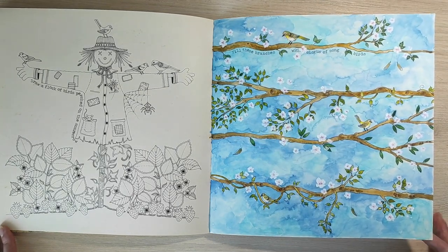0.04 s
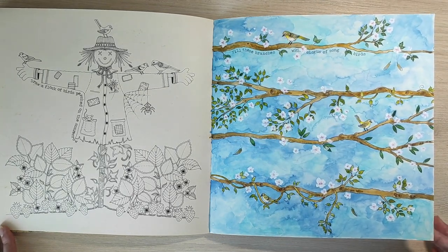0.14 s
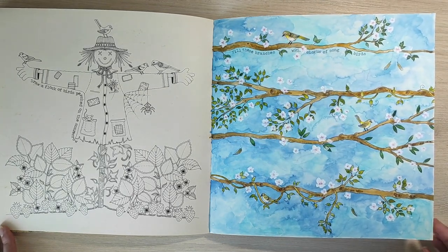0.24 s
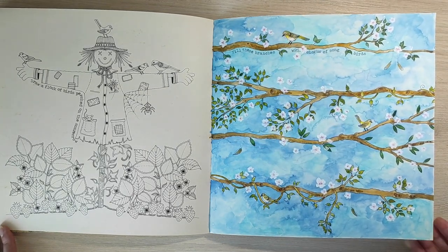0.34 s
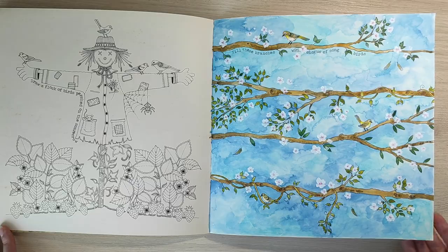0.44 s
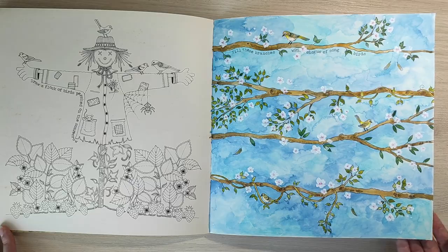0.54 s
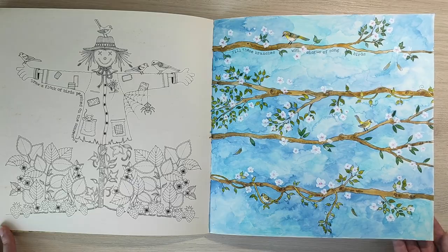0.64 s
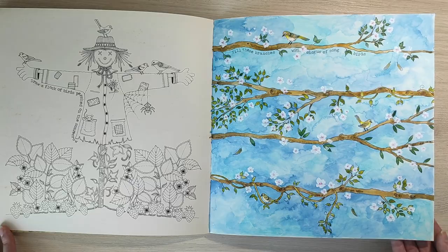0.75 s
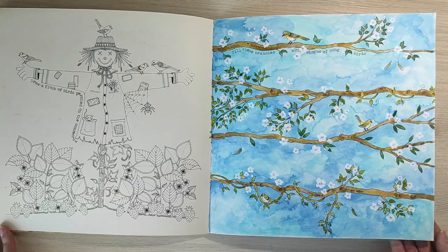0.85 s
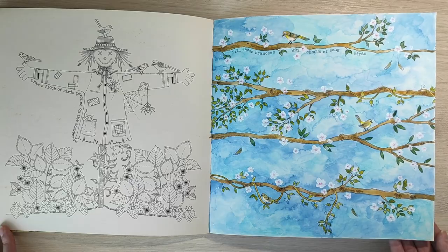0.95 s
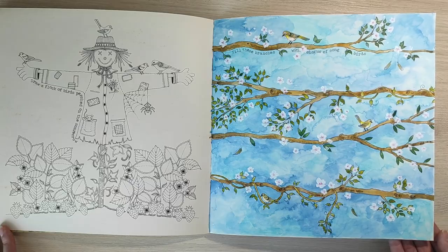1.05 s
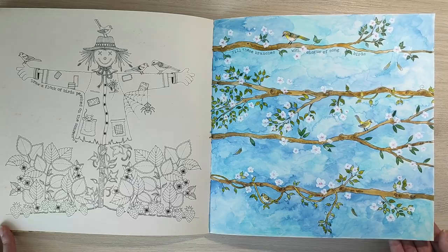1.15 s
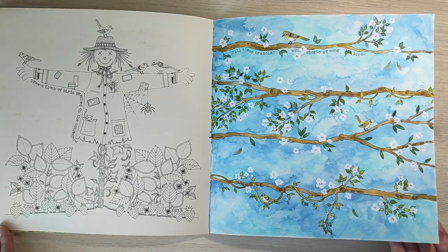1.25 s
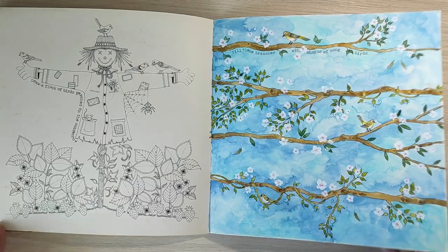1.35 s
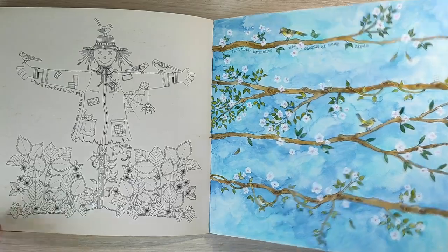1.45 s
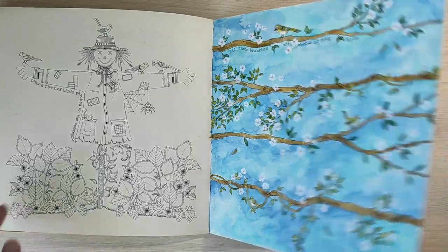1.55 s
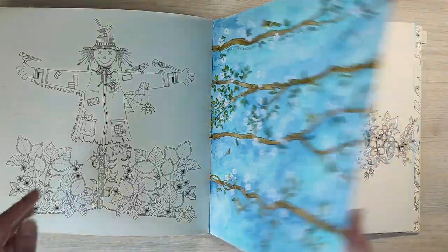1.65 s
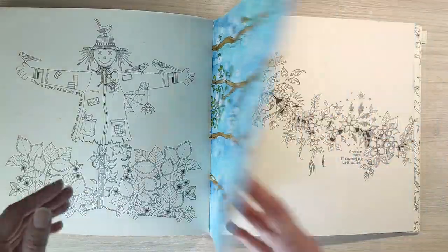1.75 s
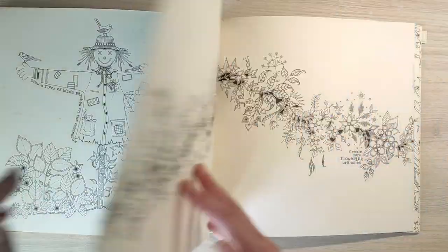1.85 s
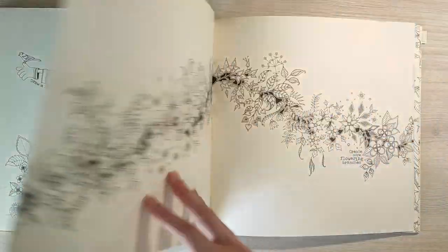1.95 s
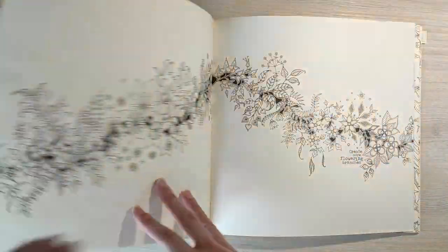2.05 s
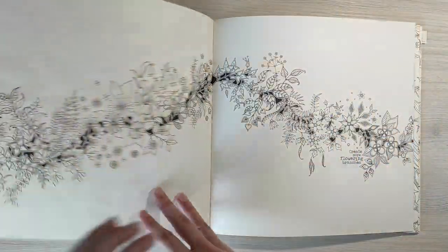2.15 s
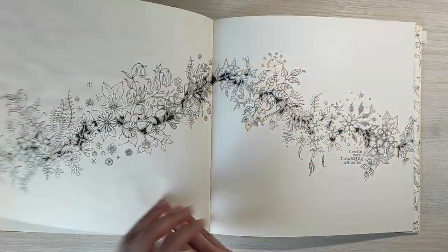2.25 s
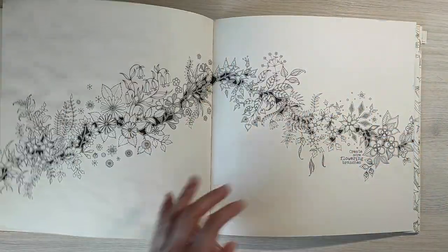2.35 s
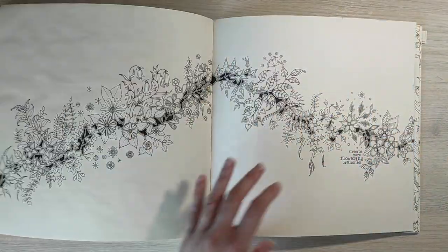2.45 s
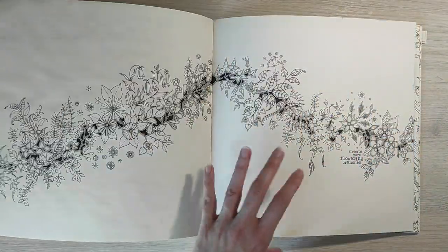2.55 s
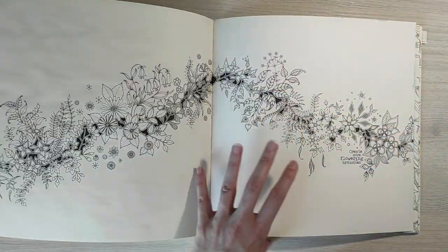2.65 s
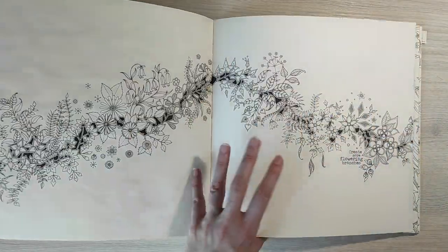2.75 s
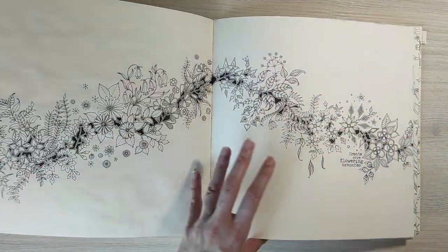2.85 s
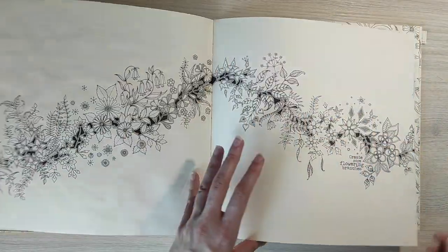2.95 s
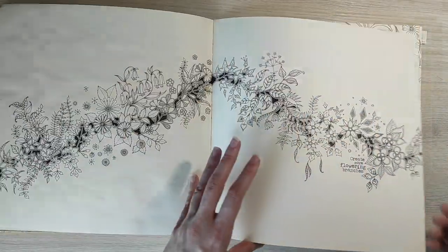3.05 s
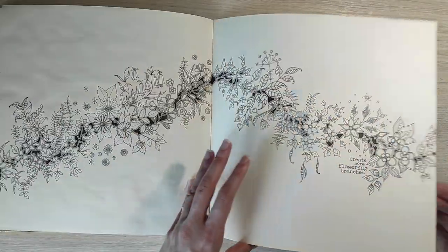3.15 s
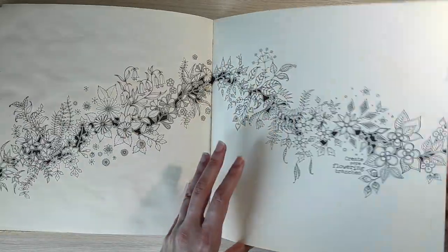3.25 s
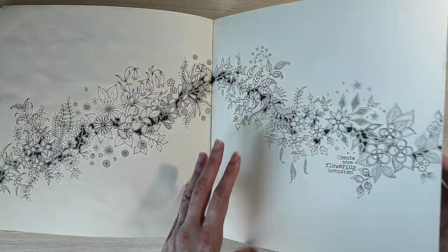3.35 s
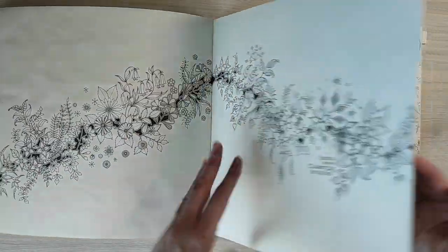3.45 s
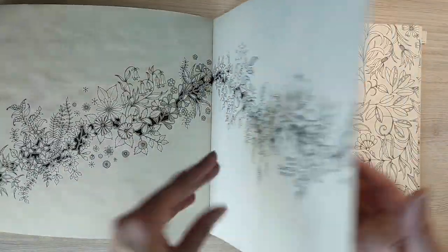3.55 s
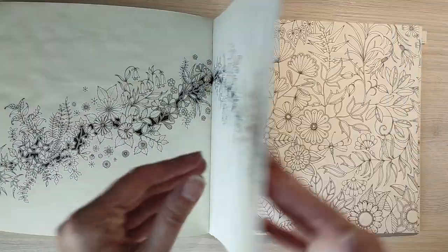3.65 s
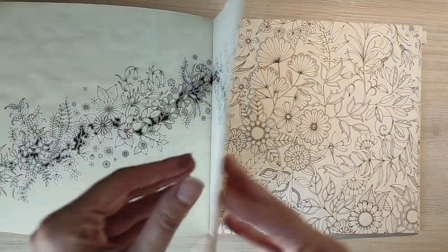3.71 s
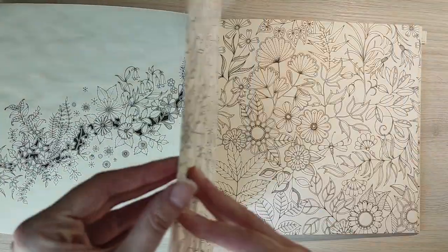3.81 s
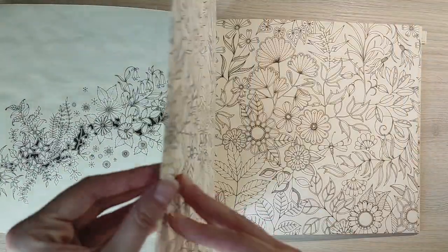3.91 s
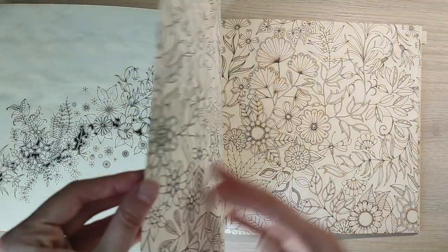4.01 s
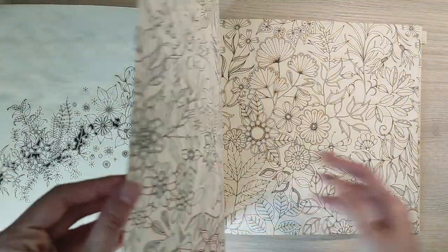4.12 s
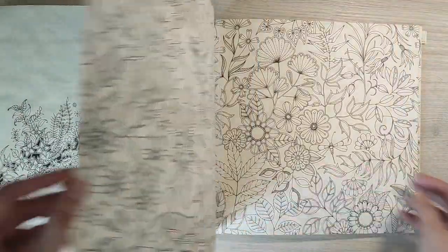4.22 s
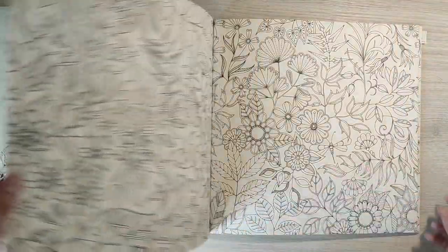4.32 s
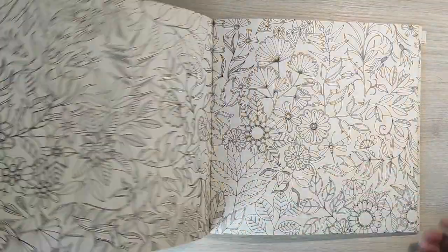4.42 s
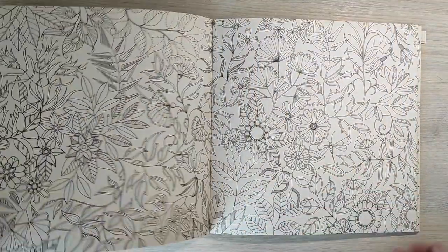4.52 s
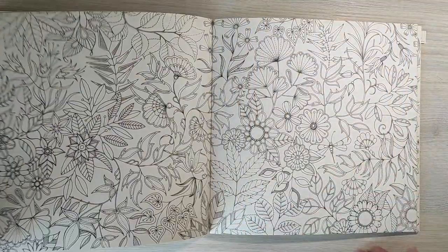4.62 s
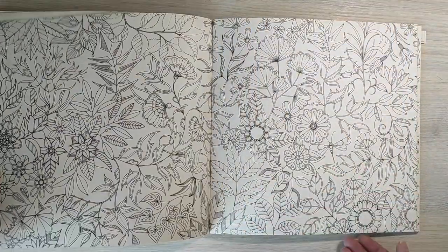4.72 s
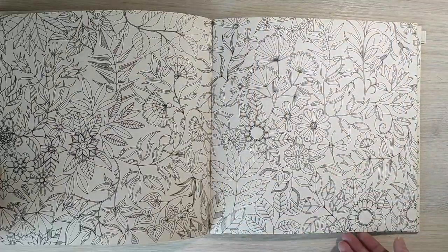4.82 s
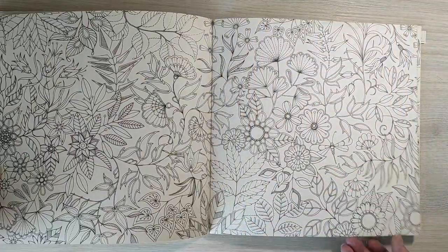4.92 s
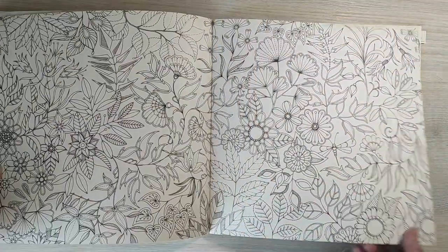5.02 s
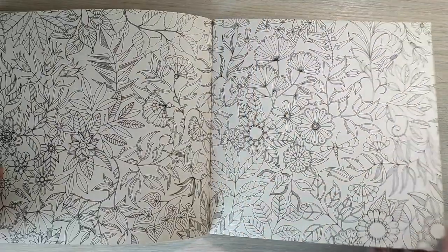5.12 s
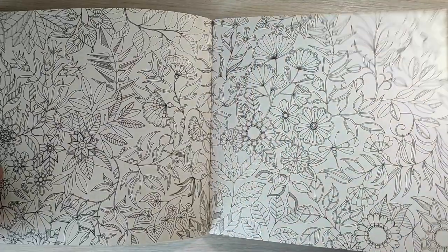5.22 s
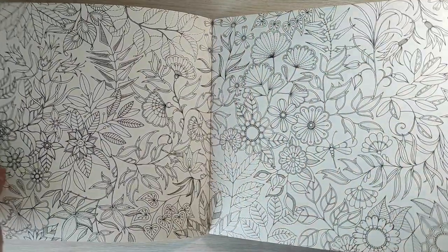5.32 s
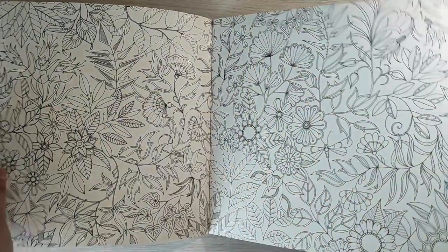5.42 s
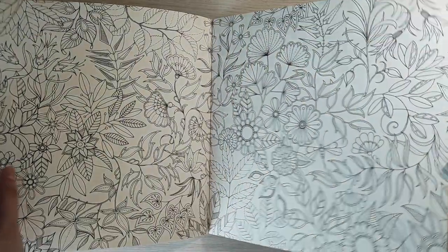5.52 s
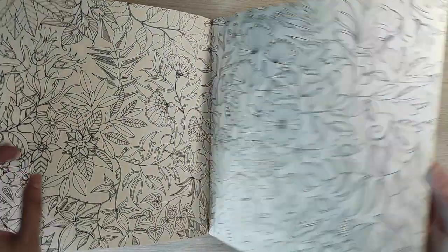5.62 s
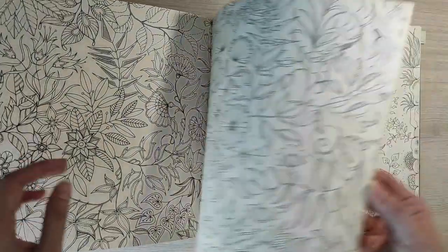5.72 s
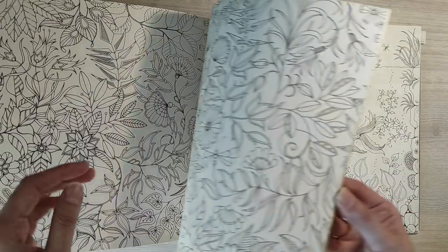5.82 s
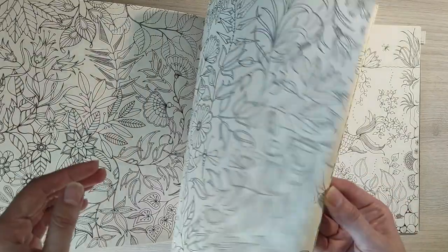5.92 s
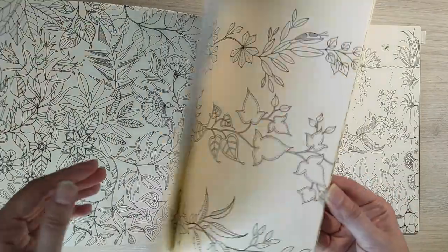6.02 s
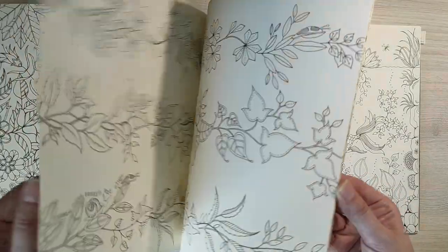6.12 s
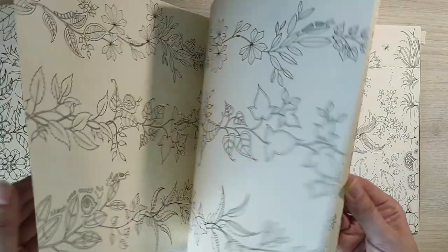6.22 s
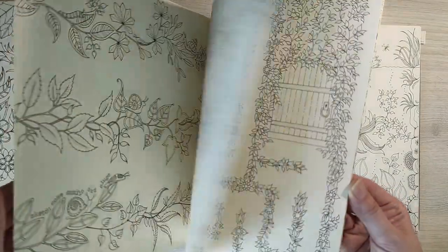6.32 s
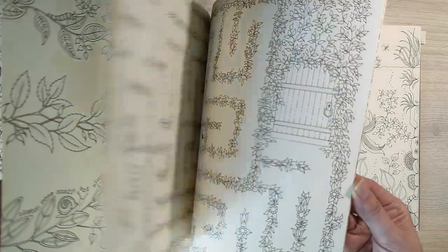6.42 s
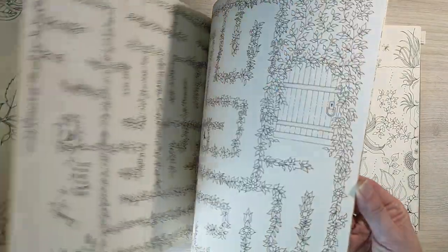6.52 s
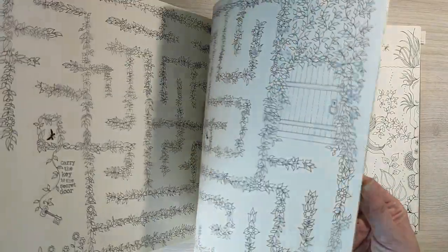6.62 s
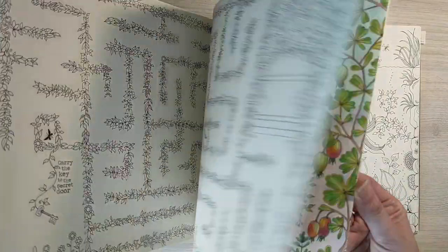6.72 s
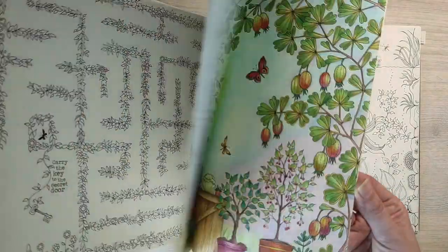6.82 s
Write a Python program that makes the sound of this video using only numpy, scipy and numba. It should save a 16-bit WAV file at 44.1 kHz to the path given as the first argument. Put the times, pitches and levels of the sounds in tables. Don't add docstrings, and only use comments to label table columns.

```python
import sys
import numpy as np
from scipy import signal
from scipy.fft import rfft, irfft, next_fast_len
from scipy.io import wavfile
from scipy.ndimage import uniform_filter1d
from numba import njit

SR = 44100
rng = np.random.default_rng(int(sys.argv[2]) if len(sys.argv) > 2 else 0)


def ratio(d):
    e = np.asarray(d, float) / 20
    return 10 ** e


def dump(signal):
    limited = np.clip(np.atleast_2d(signal).T, -1, 1)
    pcm = np.round(limited * 32767).astype(np.int16)
    wavfile.write(sys.argv[1], SR, pcm)


N = 302741
STEP = 8


def rms_one(x):
    return x / np.sqrt(np.mean(x ** 2) + 1e-20)


def in_time(table):
    s, *columns = np.transpose(table)
    return [np.interp(np.arange(0, N, STEP) / SR, s, c) for c in columns]


def at_rate(control):
    return np.interp(np.arange(N) / STEP, np.arange(len(control)), control)


def band(x, low_hz, high_hz, order=2):
    return signal.sosfilt(signal.butter(order, [low_hz, high_hz], "band", fs=SR, output="sos"), x)


def resonance(x, hz, width_hz):
    r = np.exp(-np.pi * width_hz / SR)
    poles = [1, -2 * r * np.cos(2 * np.pi * hz / SR), r * r]
    return signal.lfilter(np.array([1, 0, -1]) * (1 - r * r) / 2, poles, x)


@njit
def moving_resonance(x, hz, r, rate):
    first, out = np.zeros(len(x)), np.zeros(len(x))
    for i in range(2, len(x)):
        pull = 2 * r * np.cos(2 * np.pi * hz[i] / rate)
        first[i] = x[i] - x[i - 2] + pull * first[i - 1] - r * r * first[i - 2]
        out[i] = first[i] - first[i - 2] + pull * out[i - 1] - r * r * out[i - 2]
    return out


def drift(rate_hz):
    r = np.exp(-32 * np.pi * rate_hz / SR)
    noise = rng.standard_normal(N // 16 + 3002)
    slow = signal.lfilter([1], [1, -2 * r, r * r], noise)[3000:]
    return np.interp(np.arange(N) / 16, np.arange(len(slow)), rms_one(slow))


def sides(pan_db):
    return ratio(np.multiply.outer([.5, -.5], pan_db))


def pair(alike):
    mid, side = rng.standard_normal((2, N))
    return np.sqrt((1 + alike) / 2) * mid + np.sqrt((1 - alike) / 2) * side * [[1], [-1]]


def patchy(edges_hz, patch_db):
    noise = rng.standard_normal((2, 2, N))
    total = 0
    for k, (low_hz, high_hz) in enumerate(zip(edges_hz, edges_hz[1:])):
        total = total + band(noise[k % 2], low_hz, high_hz) * ratio(patch_db * drift(9.6))
    return rms_one(total)


def swell(peak_s, db, rise_s, fall_s):
    start, end = (peak_s - 5 * rise_s, db - 100), (peak_s + 5 * fall_s, db - 100)
    level_db, = in_time([start, (peak_s, db), end])
    return ratio(2 * level_db)


# pitch_hz, density_db (per Hz)
AIR_COLOUR = [(8, -58), (30, -65), (50, -65.5), (80, -74), (150, -81.5), (330, -80.5), (500, -87),
              (1100, -90), (2300, -97.5), (4000, -103), (7000, -108), (16000, -108)]
# pitch_hz, likeness (0-1), left_over_right_db
AIR_WIDTH = [(15, 0.83, -1), (40, 0.47, 5), (130, 0.2, 8), (300, 0.24, 7), (640, 0.1, 6), (1570, 0, -0.5),
             (9000, 0.13, 3.5)]


def room_air():
    size = next_fast_len(N, real=True)
    log_hz = np.log(np.maximum(np.arange(size // 2 + 1) * SR / size, 1))
    hz, db = np.transpose(AIR_COLOUR)
    level_db = np.interp(log_hz, np.log(hz), db)
    hz, alike, pan_db = np.transpose(AIR_WIDTH)
    alike = np.interp(log_hz, np.log(hz), alike)
    pan_db = np.interp(log_hz, np.log(hz), pan_db)
    mid, side = rfft(rng.standard_normal((2, size))) * ratio(level_db) * np.sqrt(SR / 4)
    both = np.sqrt(1 + alike) * mid + np.sqrt(1 - alike) * side * [[1], [-1]]
    return irfft(both * sides(pan_db), size)[:, :N] * ratio(1.0 * drift(2.2))


def whine():
    turns = np.cumsum(2552 + 3.44 * drift(5.3)) / SR
    tone = np.array([np.sin(2 * np.pi * turns), np.cos(2 * np.pi * turns)])
    return ratio(-65) * tone * ratio(2.4 * drift(0.62))


def hum():
    hz, width_hz = 147.1, 23
    ring = resonance(resonance(pair(0.6), hz, width_hz), hz, width_hz)
    return ratio(-60.5) * rms_one(ring) * sides(6.0)[:, None]


REST_HISS_DB, REST_BODY_DB = -77, -74
RASP_DB, RASP_FOLLOWS = -6, 0.5
BODY_LINGERS = 1.2
# peak_s, hiss_db, rise_s, fall_s, body_db (re
BRUSHES = [(.14, -63, .03, .08, -6), (.258, -57.5, 0.1, 0.095, 0), (2.768, -44, 0.0019, 0.079, -1.5),
           (2.874, -43.5, 0.031, 0.12, -3), (2.965, -43.5, 0.047, 0.084, -2), (3.01, -40, 0.038, 0.035, -6),
           (3.085, -58.5, .08, 0.075, 6), (3.276, -49.5, 0.31, 0.11, -7.5), (3.42, -44.5, 0.054, .09, -1),
           (3.462, -47.5, 0.066, .03, 6.5), (3.488, -41.5, .06, 0.041, -11),
           (3.678, -52.5, 0.049, 1, -13.5), (4.024, -47.5, 0.11, 0.029, -13),
           (4.082, -47, 0.036, 0.023, -15), (4.2, -56, 0.13, 0.14, -2), (4.435, -46.5, 0.052, 0.049, -6),
           (4.609, -47.5, 0.015, 0.13, -2.5), (4.68, -53.5, 0.16, 0.014, 3.5), (4.761, -48, .004, 0.1, 2.5),
           (4.848, -40, 0.012, 0.026, -6.5), (4.96, -45, 0.026, 0.076, -10), (4.925, -47, .06, 0.036, -3),
           (3.16, -50, 0.041, 0.037, 2.5),
           (5.746, -43.5, .012, 0.11, -8),
    (5.719, -47, 0.14, 0.055, -10),
    (5.838, -47, 0.04, 0.048, -8.5),
    (5.98, -42.5, 0.0065, 0.065, -2),
    (6.202, -39.5, 0.0022, 0.084, -6),
    (6.275, -45, 0.012, 0.041, -2),
    (6.407, -44, 0.025, 0.031, -8.5),
    (6.547, -57, 0.44, 0.1, -4.5),
    (6.656, -57, 0.012, 0.019, 4),
    (6.703, -44, 0.012, 0.008, -1.5),
]


def brush_power():
    hiss = ratio(2 * REST_HISS_DB)
    rasp = ratio(2 * (REST_HISS_DB + RASP_DB))
    body = ratio(2 * REST_BODY_DB)
    for peak_s, db, rise_s, fall_s, body_db in BRUSHES:
        power = swell(peak_s, db, rise_s, fall_s)
        hiss = hiss + power
        rasp = rasp + power * ratio(2 * (RASP_DB + RASP_FOLLOWS * body_db))
        body = body + swell(peak_s, db + body_db, rise_s, fall_s * BODY_LINGERS)
    return hiss, rasp, body


# time_s, hiss_db, body_db (re hiss), rasp_db (re hiss)
SWEEPS = [
    [(1.29, -73, -12, -13), (1.366, -48, -18, -13), (1.5, -43, -14, -12.5), (1.628, -41.5, -18.5, -13.5),
     (1.72, -43, -10.5, -10), (1.8, -50.5, -15, -10.5), (1.84, -44.5, -9, -8), (1.93, -59, -11, -7),
     (1.96, -65, -13, -6)],
    [(1.9, -57, -11, -10), (2.01, -42.5, -17.5, -12.5), (2.3, -40, -14.5, -14.5), (2.385, -40.5, -6, -6),
     (2.475, -37.5, -17, -14), (2.495, -50, -3.5, -12.5), (2.612, -54.5, -1, -8.5), (2.69, -63.5, -15, -9),
     (2.76, -64, 0, -8)],
    [(5.03, -58, -8, 0), (5.075, -44.5, -8, -1.5), (5.148, -37.5, -2.5, -3), (5.188, -35.5, -2.5, -8.5),
     (5.23, -44, -19, -13), (5.3, -41, -11.5, -6.5), (5.46, -43.5, 2, -2.5), (5.55, -36, -11, -14),
     (5.64, -56.5, -1.5, -1.5)],
]
GLOSSY_STARTS = [1.48, 2.0, 5.6]


def sweep_power():
    hiss = rasp = body = sheen = 0
    for table, glossy_s in zip(SWEEPS, GLOSSY_STARTS):
        before, after = (table[0][0] - .01, -120, 0, 0), (table[-1][0] + .01, -120, 0, 0)
        hiss_db, body_db, rasp_db = in_time([before] + table + [after])
        power = ratio(2 * hiss_db)
        gloss, = in_time([(glossy_s - .02, .1), (glossy_s + .02, 1)])
        hiss = hiss + power
        rasp = rasp + power * ratio(2 * rasp_db)
        body = body + power * ratio(2 * body_db)
        sheen = sheen + power * gloss
    return hiss, rasp, body, sheen


# time_s, pitch_hz
SCRAPE = [(1.3, 3600), (1.75, 3300), (2.0, 4100), (2.4, 3020), (2.78, 2400), (2.9, 2300), (3.0, 2240),
          (3.44, 1650), (3.7, 3900), (4.6, 3660), (4.9, 4170), (5.09, 3560), (5.17, 4000), (5.23, 4000),
          (5.28, 2970), (5.35, 3000), (5.41, 2720), (5.46, 2470), (5.52, 2580), (5.58, 3530), (6.8, 3700)]


def scrape():
    width_hz = 910
    centre_hz = at_rate(in_time(SCRAPE)[0]) * ratio(0.27 * drift(6.2))
    r = np.exp(-np.pi * width_hz / SR)
    sings = np.array([moving_resonance(c, centre_hz, r, SR) for c in pair(0.1)])
    return sings / np.sqrt(uniform_filter1d(np.mean(sings ** 2, axis=0), size=4000))


HISS_BANDS = [5710, 6920, 8350, 11830]
RASP_BANDS = [2400, 2920, 3800, 5170]
BODY_BANDS = [650, 1070, 1500, 2350]


def slide():
    brushed, swept = brush_power(), sweep_power()
    hiss_gain, rasp_gain, body_gain = [at_rate(np.sqrt(a + b)) for a, b in zip(brushed, swept)]
    sheen_gain = at_rate(np.sqrt(swept[3]))
    hiss = patchy(HISS_BANDS, 1.56) * hiss_gain * ratio(-2.36) * sides(0.34)[:, None]
    sheen = patchy([9750, 11700, 15490], 5.0) * sheen_gain * ratio(-2.5)
    rasp = patchy(RASP_BANDS, 2.4) + ratio(-5) * scrape() * sides(4.5)[:, None]
    rasp = rasp * rasp_gain * ratio(0.76) * sides(-4.4)[:, None]
    body = patchy(BODY_BANDS, 3.8) * body_gain * ratio(3.0) * sides(1.4)[:, None]
    grain = ratio(1.1 * drift(48.0) + 0.9 * drift(180))
    return (hiss + sheen + rasp + body) * grain


REST_FLUTTER_DB, REST_HZ, REST_PUSH_DB = -65.5, 315, -58
PUSH_DB, PUSH_LOSS_DB_PER_OCTAVE = 1.5, 17
# peak_s, flutter_db, rise_s, fall_s, pitch_hz
FLAPS = [(.29, -52.5, 0.3, .02, 274), (1.138, -63, 0.036, 0.036, 300), (1.52, -56, 0.17, 0.028, 505),
         (1.684, -44, .008, 0.083, 390), (1.736, -42, .12, 0.036, 348), (2.386, -47.5, 0.08, .1, 605),
         (2.77, -38, .002, 0.14, 356), (2.796, -31.5, 0.026, 0.044, 400), (2.966, -41.5, 0.15, 0.11, 580),
         (3.42, -37, 0.017, .07, 460), (3.495, -37.5, 0.024, 0.061, 500), (3.515, -36.5, 0.077, 0.11, 327),
         (3.71, -41, 0.058, 0.16, 315), (3.75, -49, 0.12, 0.051, 310), (4.202, -51.5, 0.19, 0.089, 344),
         (4.314, -43.5, 0.0077, 0.085, 324), (4.5, -55.5, 0.65, 0.58, 760), (4.65, -54.5, 0.33, 0.068, 476),
         (4.761, -41.5, 0.0056, 0.1, 573), (4.846, -47.5, 0.03, 0.34, 415),
         (5.085, -40.5, 0.055, 0.24, 640), (5.172, -35.5, 0.021, 0.15, 610),
         (5.462, -39.5, 0.19, 0.15, 640), (5.752, -46, 0.23, 0.083, 377), (5.858, -49, 0.045, 0.39, 300),
         (5.987, -32, 0.0025, 0.036, 477), (6.1, -52, 0.33, 0.28, 765), (6.8, -53, 0.58, 0.33, 750),
         (6.203, -35, 0.0026, .1, 450), (6.223, -28.5, 0.015, 0.13, 400), (6.25, -25, 0.037, 0.11, 640),
         (6.284, -22, 0.068, 0.04, 616), (6.522, -48, .02, 0.31, 310), (6.708, -33, .008, 0.044, 530)]


def buckling():
    flutter = ratio(2 * (REST_FLUTTER_DB + 3.9 * drift(17.0)[::STEP]))
    push = ratio(2 * (REST_PUSH_DB + 3.6 * drift(4.0)[::STEP]))
    weighted_hz = flutter * REST_HZ
    for peak_s, db, rise_s, fall_s, hz in FLAPS:
        power = swell(peak_s, db, rise_s, fall_s)
        flutter = flutter + power
        weighted_hz = weighted_hz + power * hz
        push = push + power * ratio(2 * (PUSH_DB - PUSH_LOSS_DB_PER_OCTAVE * np.log2(hz / REST_HZ)))
    return at_rate(np.sqrt(flutter)), at_rate(weighted_hz / flutter), at_rate(np.sqrt(push))


# pitch_hz, width_hz, level_db
SHEET_MODES = [(256, 115, 5), (400, 63, 9.5), (610, 640, -3.5), (800, 26, 1)]


def flap():
    flutter, centre_hz, push = buckling()
    shake = pair(0.58)
    r = np.exp(-np.pi * 300 / SR)
    moving = np.array([moving_resonance(c, centre_hz, r, SR) for c in shake])
    modes = 0
    for k, (hz, width_hz, db) in enumerate(SHEET_MODES):
        modes = modes + (-1) ** k * ratio(db) * resonance(shake, hz, width_hz)
    sheet = rms_one(moving) + 0.77 * rms_one(band(modes, 190, 965, order=4))
    sheet = sheet / np.sqrt(uniform_filter1d(np.mean(sheet ** 2, axis=0), size=1200))
    crinkle_db = -35.5 + 27 * np.log2(centre_hz / REST_HZ)
    crinkle = ratio(crinkle_db) * rms_one(band(shake, 670, 1043, order=3))
    rattle = ratio(15.5) * flutter ** 2.29 * rms_one(band(shake, 1260, 1620, order=3))
    air_push = rms_one(band(pair(0.5), 122, 181)) * push
    return ((sheet + crinkle) * flutter + rattle + air_push) * ratio(-0.92) * sides(2.7)[:, None]


# start_s, peak_db, body_db (re peak), left_over_right_db
SNAPS = [(1.5064, -26.5, 0, 5), (2.365, -36, -12, -5.0), (2.768, -26, -2, -12), (2.7932, -27.5, -15, -14),
         (2.874, -30, -10, -10), (3.004, -26, 0, -5), (3.009, -28, -2, -6), (3.0125, -26, -2, 3),
         (3.146, -37, -13, -10), (3.163, -41, 3, -7.0), (3.463, -41, -6, -5), (4.3143, -39, 3.5, -2),
         (4.6074, -31, -6, -4.5), (4.761, -28.5, 0, -1), (4.843, -29.5, -12, -7), (4.9544, -23.5, -24, -11),
         (4.907, -35, -8, -8), (4.932, -28.5, -20, -11), (5.1813, -16.5, -11, -10),
         (5.7426, -12.5, -11, -9.5), (5.969, -32, -4, -2), (5.9766, -25, -9, -9), (5.9802, -9, -5.5, -3.5),
         (6.2018, -17, -3.5, -0.5), (6.274, -17, -6, -3), (6.6554, -37, -9, -7), (6.6912, -31.5, -29, -10),
         (6.403, -38, -10, -5), (6.7042, -27, -3.5, -17.5)]


def snaps():
    out, t = np.zeros((2, N + SR)), np.arange(SR // 8) / SR
    tick = (1 - np.exp(-t / 0.0004)) * ratio(-60 * t / 0.0095) + ratio(-22.0 - 60 * t / 0.041)
    answer = (1 - np.exp(-t / 0.001)) * ratio(-60 * t / 0.022) + ratio(-21 - 60 * t / 0.035)
    for start_s, peak_db, body_db, pan_db in SNAPS:
        noise = rng.standard_normal((2, len(t)))
        noise[1] = 0.41 * noise[0] + 0.66 * noise[1]
        bright = band(noise * tick, 3440, 8900) * ratio(-4.5)
        top = band(noise * tick, 8900, 11000) * ratio(-13.5)
        body = band(noise * answer, 500, 2330) * ratio(body_db + 4.5)
        sound = (bright + top + body) * ratio(peak_db) * sides(pan_db - 4.5)[:, None]
        out[:, round(start_s * SR):][:, :len(t)] += sound
    return out[:, :N]


def struck_paper(table):
    out, t = np.zeros(N + SR), np.arange(SR // 4) / SR
    for start_s, peak_db, hz, t60_s in table:
        shape = (1 - np.exp(-(t / 0.002) ** 2)) * ratio(-60 * t / t60_s)
        ring = np.sin(2 * np.pi * hz * t) + 0.27 * np.sin(2 * np.pi * 1.438 * hz * t + 0.86)
        out[round(start_s * SR):][:len(t)] += ratio(peak_db + 3.0) * shape * ring
    return out[:N] * sides(3.5)[:, None]


# start_s, peak_db, pitch_hz, t60_s
POPS = [(1.508, -32, 703, 0.025), (2.37, -34.5, 1286, 0.032), (2.769, -40.5, 2350, .06),
        (2.787, -39, 2400, 0.034), (2.963, -31.5, 607, 0.035), (2.988, -30.5, 550, 0.039),
        (3.414, -28, 410, 0.033), (3.43, -33, 420, .04), (3.49, -25, 393, 0.047), (3.492, -24, 616, 0.027),
        (3.507, -27, 400, 0.071), (4.313, -33, 278, 0.041), (4.314, -34.5, 640, 0.043),
        (4.762, -31, 673, 0.022), (5.148, -3, 572, 0.02), (5.981, -27, 463, 0.02),
        (5.983, -24, 1700, 0.024), (6.214, -29, 1490, 0.03), (6.218, -17, 687, 0.037),
        (6.234, -16, 460, 0.034), (6.24, -17, 930, .025), (6.265, -21, 515, 0.04),
        (6.276, -26, 1370, 0.037), (6.226, -23, 800, 0.066), (6.244, -22, 400, .04),
        (6.26, -20, 890, 0.038), (6.284, -20.5, 796, 0.033), (5.149, -19.5, 966, 0.033),
        (6.293, -20.5, 757, 0.049), (6.255, -12.5, 578, 0.034), (6.279, -10, 640, 0.025),
        (4.85, -41, 3830, 0.028), (4.955, -42, 3880, 0.036), (4.93, -35.5, 703, 0.037),
        (5.085, -26.5, 610, .04), (5.17, -28.5, 616, 0.055), (5.478, -33, 708, 0.086),
        (6.345, -50, 686, 0.031), (6.706, -28, 455, 0.032), (6.708, -34, 1650, 0.03),
        (6.724, -31, 440, 0.024), (3.493, -28, 692, 0.028), (3.422, -31, 514, 0.056),
        (3.438, -34, 456, .04), (3.512, -30, 476, 0.036), (3.527, -28, 420, .05),
        (6.279, -27.5, 1910, 0.028), (6.289, -33, 1390, 0.038)]


def pops():
    return struck_paper(POPS)


# start_s, peak_db, pitch_hz, t60_s
THUDS = [(1.68, -35, 426, 0.084), (1.713, -36.5, 400, 0.13), (1.7, -34.5, 120, 0.096),
         (2.79, -27.5, 152, 0.16), (2.772, -33, 300, 0.067), (3.491, -31.5, 63, 0.11),
         (3.505, -33.5, 258.5, 0.14), (3.705, -36.5, 409, 0.062), (3.72, -38, 246, 0.1),
         (3.731, -32, 345, 0.048), (6.222, -20.5, 260, 0.11), (6.24, -35, 137, 0.08),
         (3.462, -35, 58.5, 0.11), (3.725, -43, 50, 0.11), (4.335, -41, 200, 0.079),
         (5.465, -37, 233, 0.094), (6.206, -36, 85, .12), (6.265, -32, 64.6, 0.13),
         (6.295, -38, 55.6, 0.12)]


def thuds():
    return struck_paper(THUDS)


def reflections(x):
    t60_s = 0.29
    t = np.arange(int(.3 * SR)) / SR
    tail = rng.standard_normal((2, len(t))) * ratio(-60 * t / t60_s) * (t > .004)
    tail = band(tail, 200, 4400, order=1)
    return signal.fftconvolve(x, tail / np.sqrt(np.sum(tail ** 2) / 2), axes=1)[:, :N]


def scene():
    room = room_air() + whine() + hum()
    paper = slide() + flap() + snaps() + pops() + thuds()
    return room + paper + ratio(-17.5) * reflections(paper)


# pitch_hz, width_hz, level_db
PORTS = [
    (8520, 790, 1.5),
    (7573, 890, 12.5),
]


def microphone(dry):
    ported = np.array([c + ratio(db) * resonance(c, hz, width_hz) for c, (hz, width_hz, db) in zip(dry, PORTS)])
    below = signal.sosfilt(signal.butter(8, 9300, fs=SR, output="sos"), ported)
    above = ratio(-11.0) * band(dry, 9800, 22000, order=3)
    circuit_hiss = ratio(-71) * rng.standard_normal(dry.shape)
    return below + above + circuit_hiss


def roll_off(x):
    return signal.sosfilt(signal.butter(12, 15720, fs=SR, output="sos"), x)


def record(dry):
    mix = microphone(dry)
    return roll_off(mix)


dry = scene()
out = record(dry)
dump(out)
```